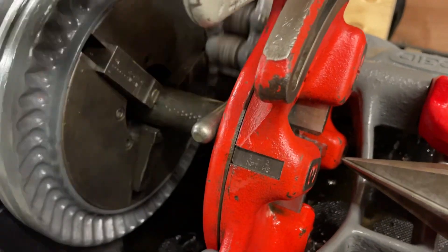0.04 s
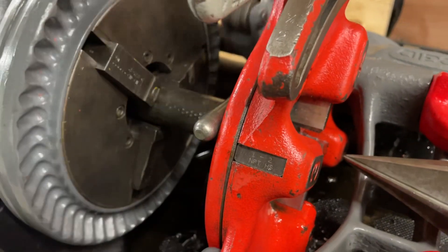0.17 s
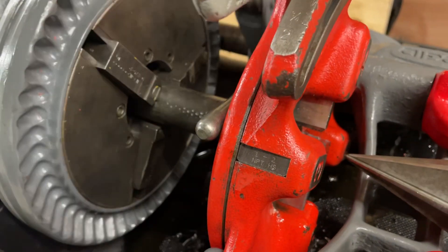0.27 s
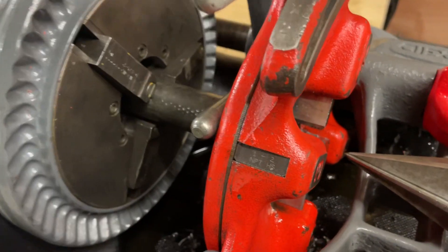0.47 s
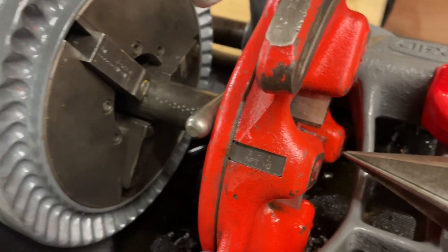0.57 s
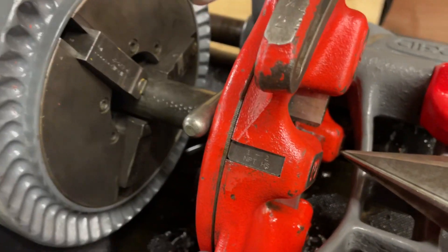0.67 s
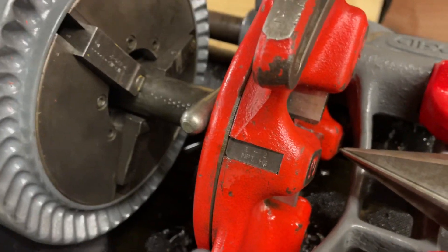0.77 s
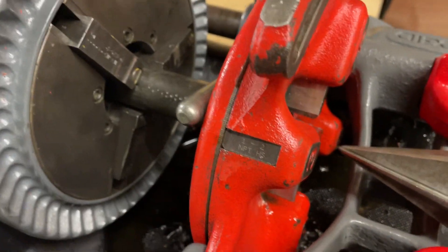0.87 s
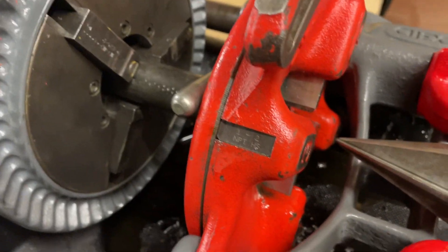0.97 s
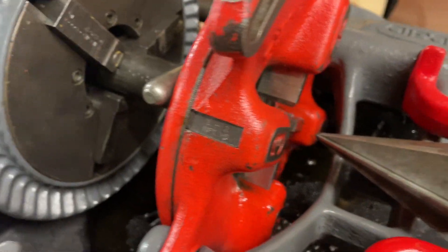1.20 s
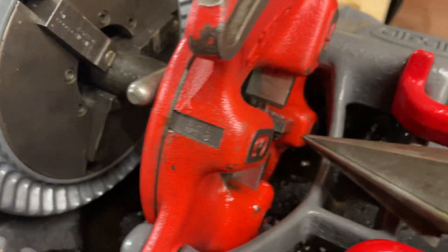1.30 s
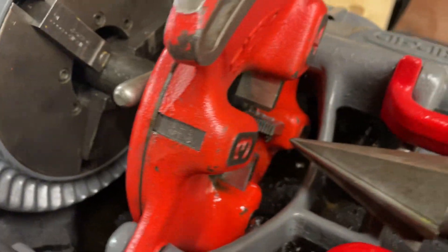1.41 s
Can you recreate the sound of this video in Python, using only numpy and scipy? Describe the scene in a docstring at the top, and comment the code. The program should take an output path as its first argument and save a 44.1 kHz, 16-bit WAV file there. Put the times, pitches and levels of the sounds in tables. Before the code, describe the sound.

Hard steel clank, then half a second later a rattling double clank, over low workshop hum

```python
"""A low wavering hum and rumbling air: a quiet workshop; faint swells of hissing noise lie over the scene.
Close to the microphones, steel parts of a pipe threading machine are swung into place. One drops against its stop
with a single clank; a second lands, bounces and settles with a click. Contact noise excites dense and ringing modes,
the cast frame thuds, shaped noise tails make the room, and the recorder's limiter ducks the clanks, then recovers."""
import sys
import numpy as np
from scipy import signal
from scipy.fft import rfft, irfft
from scipy.io import wavfile
from scipy.ndimage import uniform_filter1d, minimum_filter1d

SR = 44100
rng = np.random.default_rng(int(sys.argv[2]) if len(sys.argv) > 2 else 0)


def log_audio(samples):
    """Write samples as a 16-bit WAV file to the path given in sys.argv[1]."""
    # one column per channel
    frames = np.atleast_2d(samples).T
    # limit to full scale, then quantise
    limited = np.clip(frames, -1, 1)
    pcm = np.round(limited * 32767).astype(np.int16)
    wavfile.write(sys.argv[1], SR, pcm)


N = 63945

# Steady hum lines of the workshop. Each row: frequency [Hz], level before the slow level curve [dB].
HUM_LINES = [(59.2, -34.5), (119.5, -47.5), (181, -58.5), (362, -57.5)]
# Slow level of hum and air together. Each row: time [s], gain [dB].
BACKGROUND_LEVEL = [(0, -2), (.1, -2), (.25, 2), (.5, -0.5), (.72, -2.5), (.93, -5), (1.05, -3),
                    (1.25, -8.5), (1.45, -5.5)]
# Spectrum of the room air. Each row: frequency [Hz], relative density [dB per Hz].
AIR_COLOUR = [(25, -18), (50, -2), (110, -2), (250, -12), (500, -19), (1000, -26), (2000, -32), (4000, -38),
              (7000, -46), (13000, -61)]
HUM_WAVER_DB, AIR_DB = .8, -40.5

# Swells of faint hiss over the scene. Each row: start [s], length before release [s], level [dB].
HISS_SWELLS = [(.008, 0.059, -57), (0.099, 0.36, -64), (0.423, 0.098, -64), (1.04, 0.18, -61.5),
               (1.403, .12, -54)]
# Spectrum of the hiss. Each row: frequency [Hz], relative density [dB per Hz].
HISS_COLOUR = [(200, -5), (1500, -5.5), (4000, -7.5), (6800, -8), (8400, -23), (11000, -8.5),
               (13000, -16.5)]
HISS_ATTACK_S, HISS_RELEASE_S = 0.013, 0.046

# The first clank: a weak onset on one side, then the hard blow and a weaker one. Each row: start [s], level [dB],
# body [dB], presence [dB], top [dB], chatter length [s], left minus right [dB]; levels are relative.
FIRST_CLANK = [(.2222, -21, -24, -5.5, -17, 0.0028, -33), (.2262, 1, 7.5, 1.5, 2.5, 0.001, 2.5),
               (.2305, -11.5, 7, 6.5, 11.5, 0.0013, -2.5)]
# Blows of the second part, landing and bouncing. Each row: start [s], level [dB], body [dB], presence [dB],
# top [dB], chatter length [s], left minus right [dB]; levels are relative.
LATCH_BLOWS = [(.7755, -24, 13, 1.5, -1, 0.004, -7.5), (.779, -21.5, 15.5, -4.5, 11.5, 0.009, 5),
               (.7835, -4, 6.5, 0.5, 4.5, 0.0039, 0.5), (.801, -16, 10.5, 1.5, 2.5, 0.0064, -9.5),
               (.8142, -9, 8, -1, -4, 0.0053, 4.5), (.8405, -29, 10, 12, 9, 0.0068, 13.5),
               (.846, -21, 0.5, 7, 5, 0.0029, -6.5), (.893, -35.5, -8, 6, -4, 0.0015, 5),
               (.9185, -18.5, 7, -18.5, -15, 0.0063, 1), (.939, -26.5, 4.5, 12, 4, 0.0015, 2),
               (.9485, -27.5, 4.5, -28, -7, 0.0049, -4), (.970, -29, 5.5, -52, -11, 0.021, 6)]
# Ringing modes of the first part. Each row: frequency [Hz], relative level [dB], 60 dB decay time [s].
STOP_MODES = [(209.7, -2.5, 0.41), (297.5, -4, .25), (379.5, 6.5, 0.15), (445, -13, 0.095), (542.5, 0, 0.2),
              (664, -8, .16), (802, -2.5, 0.49), (839.5, 7.5, 0.17), (1187, -2, 0.15), (1308, -8.5, 0.65),
              (1540, 4, 0.091), (2040, 5, 0.045), (2680, -5, .12), (2996, 1, 0.13)]
# Ringing modes of the second part. Each row: frequency [Hz], relative level [dB], 60 dB decay time [s].
LATCH_MODES = [(171, -4, 0.51), (257.2, 3.5, .3), (279, -9, 0.73), (382.2, -15.5, 0.067), (461, -7.5, 0.23),
               (492.3, -10.5, 0.29), (544.4, 0.5, 0.13), (672, -6.5, 0.11), (787, 1, 0.33), (1700, -1, .14),
               (1744, -4, .15), (2910, -2.5, .15), (3750, 7, 0.098), (4888, 0, .17)]
# Dense, quickly damped modes of the first part. Each row: frequency [Hz], relative density [dB per Hz].
STOP_COLOUR = [(50, -19.5), (150, -2.5), (350, -4.5), (750, -5), (1600, -4), (3000, -5.5), (4500, -15.5),
               (6700, -17.5), (8400, -28), (11000, -22.5), (12700, -26), (15000, -47)]
# Dense, quickly damped modes of the second part. Each row: frequency [Hz], relative density [dB per Hz].
LATCH_COLOUR = [(70, -28), (250, -13.5), (550, -4), (1200, -7.5), (1700, -3), (2700, -7), (3800, -5.5),
                (6800, -14.5), (8400, -23), (10000, -24), (12500, -22), (15000, -62.5)]
# Gains of the dense modes, the ringing modes and the room; 60 dB decay of the dense modes at TREBLE_HZ
STOP_DB, STOP_RING_DB, STOP_ROOM_DB, STOP_T60_S = 19.5, -22.5, 20.5, 0.047
LATCH_DB, LATCH_RING_DB, LATCH_ROOM_DB, LATCH_T60_S = 23, -17, 23, .04
TREBLE_HZ, DAMPING_SLOPE = 3540, 0.065
# Regions of the spectrum that a blow's body, presence and top levels act on
BODY_HZ, BODY_OCTAVES, PRESENCE_HZ, PRESENCE_OCTAVES, BRIGHT_HZ = 417, 1, 3620, 0.82, 8200
CHATTER_DB, CHATTER_LOW_HZ = 1, 896  # below this the chatter merges into one push
EVEN_HZ = 150  # smoothing width
WIDTH, WIDE_HZ = 0.53, 500  # side against mid in the treble; the bass is alike left and right

# Colour of the workshop's reverberation. Each row: frequency [Hz], gain [dB].
ROOM_COLOUR = [(80, -4), (250, 8.5), (800, 2), (2000, -0.5), (4000, -2), (7000, -2), (12000, -5)]
# Length of the late tail. Each row: frequency [Hz], 60 dB decay time [s].
ROOM_T60 = [(100, 0.35), (500, 0.59), (2500, 0.92), (6000, 0.66), (12000, 0.3)]
ROOM_DB, ROOM_BUILD_S, ROOM_WIDTH = -15.5, 0.032, 0.94
EARLY_DB, EARLY_T60_S = -11, 0.15

# Jolts of the cast frame. Each row: start [s], relative level [dB].
JOLTS = [(0.2307, -0.5), (0.7936, 1), (0.817, -6), (0.947, -15), (0.98, -19)]
# Low modes of the frame. Each row: frequency [Hz], relative level [dB], 60 dB decay time [s].
FRAME_MODES = [(116.5, 0.5, 0.071), (178.7, -1.5, 0.084)]
FRAME_DB = -4.5

# Recorder: treble notch and low cut, then limiter, rounded peaks and top cut
NOTCH_HZ, NOTCH_WIDTH_HZ, NOTCH_DB, LOW_CUT_HZ = 8350, 687, -18.5, 38
LIMIT_DB, HOLD_S, RELEASE_DB_PER_S, LOOKAHEAD_S, DETECT_S = -9, 0.099, 79, 0.0028, .005
CEILING, TOP_HZ = .92, 13300  # for the ceiling, full scale is 1


def undb(db):
    """Decibels to gain."""
    return 10 ** (np.asarray(db) / 20)


def clock():
    """Time of each sample in seconds."""
    return np.arange(N) / SR


def along(points, hz):
    """Reads (Hz, value) points on a log-frequency axis."""
    point_hz, values = np.array(points, float).T
    return np.interp(np.log(hz + 1), np.log(point_hz), values)


def shape(x, db_of):
    """Filters x by a gain in dB given as a function of frequency."""
    hz = np.arange(N + 1) * SR / (2 * N)
    return irfft(rfft(x, 2 * N) * undb(db_of(hz)))[..., :N]


def noise(colour, width):
    """Stereo noise of rms 1 with the given colour, wider towards the treble."""
    hz = np.fft.rfftfreq(N, 1 / SR)
    mid, side = rfft(rng.standard_normal((2, N)))
    side = side * width * hz ** 2 / (hz ** 2 + WIDE_HZ ** 2)
    x = irfft(np.array([mid + side, mid - side]) * undb(along(colour, hz)), N)
    return x / x.std()


def background():
    """A mains hum whose lines waver separately, over the rumble and air of the room."""
    t, hum = clock(), 0
    knots = np.linspace(0, t[-1], num=16)
    for hz, db in HUM_LINES:
        waver_db = HUM_WAVER_DB * np.interp(t, knots, rng.standard_normal(size=16))
        line = np.sin(2 * np.pi * (hz * t + rng.random()))
        hum = hum + np.sqrt(2) * undb(db + waver_db) * line  # root two: levels are rms
    air = undb(AIR_DB) * noise(AIR_COLOUR, ROOM_WIDTH)
    return (hum + air) * undb(np.interp(t, *np.array(BACKGROUND_LEVEL).T))


def faint_hiss():
    """Coloured stereo noise comes and goes in faint swells around the clanks."""
    t, level = clock(), 0
    for start, length, db in HISS_SWELLS:
        end = start + length
        corners = [start, start + HISS_ATTACK_S, end, end + HISS_RELEASE_S]
        level = level + undb(db) * np.interp(t, corners, [0.0025, 1, 0.89, 0])
    return level * noise(HISS_COLOUR, WIDTH)


def contact_db(hz, body_db, presence_db, top_db):
    """Colours one row of a clank: humps of body and presence, and a top shelf."""
    def hump(centre, octaves):
        return np.exp(-(np.log2((hz + 1) / centre) / octaves) ** 2)

    body = body_db * hump(BODY_HZ, BODY_OCTAVES)
    presence = presence_db * hump(PRESENCE_HZ, PRESENCE_OCTAVES)
    top = top_db * hz ** 6 / (hz ** 6 + BRIGHT_HZ ** 6)
    return body + presence + top


def convolve(x, response):
    """Plays x through a stereo response."""
    return signal.fftconvolve(np.atleast_2d(x), response, axes=1)[:, :N]


def part(rows, dense, modes, room):
    """Each row is an impulse and a brief chatter of noise; the part cracks and rings, and the room answers."""
    t, near, contacts = clock(), 0, 0
    high_pass = signal.butter(2, CHATTER_LOW_HZ, "high", fs=SR)
    for start, db, body_db, presence_db, top_db, length, pan_db in rows:
        age = t - start
        chatter = rng.standard_normal(N) * (age > 0) * np.exp(-(age / length) ** 2)
        chatter = signal.lfilter(*high_pass, chatter)
        contact = signal.unit_impulse(N, int(start * SR))
        force = contact + undb(CHATTER_DB) * chatter / np.sqrt(np.sum(chatter ** 2))
        pair = np.array([force, contact])
        force, contact = undb(db) * shape(pair, lambda hz: contact_db(hz, body_db, presence_db, top_db))
        near = near + force * undb(np.array([[pan_db], [-pan_db]]) / 2)
        contacts = contacts + contact
    # chatter drives only the dense modes; ringing and room answer the bare contacts
    return convolve(near, dense) + convolve(contacts, modes + room)


def fade(x, t60_of):
    """Lets each octave of x die away at its own rate; the channels average unit energy."""
    centres = 2. ** np.arange(6, 15)
    hz, spec, out = np.fft.rfftfreq(N, 1 / SR), rfft(x), 0
    for centre, pick in zip(centres, np.eye(len(centres))):
        weight = along(list(zip(centres, pick)), hz)  # overlapping triangles, one per octave
        decay = np.exp(-np.log(1000) * clock() / t60_of(centre))
        out = out + irfft(spec * weight, N) * decay
    return out / np.sqrt(np.sum(out ** 2) / 2)


def even(x, colour):
    """Gives each channel of a short burst the stated colour, keeping its fine peaks; average energy is 1."""
    hz, spec = np.fft.rfftfreq(N, 1 / SR), rfft(x)
    bins = int(EVEN_HZ * N / SR)
    power = uniform_filter1d(uniform_filter1d(np.abs(spec) ** 2, bins), bins)
    flat = spec / np.sqrt(np.abs(power) + 1e-12)
    x = irfft(flat * undb(along(colour, hz)), N) * (clock() < .5)
    return x / np.sqrt(np.sum(x ** 2) / 2)


def crack(colour, t60):
    """The dense, quickly damped modes of a steel part; the higher ones die first."""
    burst = fade(noise(colour, WIDTH), lambda hz: t60 * (TREBLE_HZ / hz) ** DAMPING_SLOPE)
    return even(burst, colour)


def ring(modes):
    """Decaying sines; the higher ones reach the two microphones out of step."""
    t, out = clock(), 0
    draws = 2 * rng.random((len(modes), 2)) - 1
    for (hz, db, t60), (turn, phase) in zip(modes, draws):
        lag = turn * np.array([[1], [-1]]) + np.pi * phase
        lag = lag * hz ** 2 / (hz ** 2 + WIDE_HZ ** 2)
        out = out + undb(db) * np.sin(2 * np.pi * hz * t + lag) * np.exp(-np.log(1000) * t / t60)
    return out


def workshop(colour, db):
    """A part's sound spread by the room: early reflections from machine and bench, and a long tail, as noise."""
    build = 1 - np.exp(-clock() / ROOM_BUILD_S)
    early = fade(noise(colour, ROOM_WIDTH) * build, lambda hz: EARLY_T60_S)
    late = fade(noise(colour, ROOM_WIDTH) * build, lambda hz: along(ROOM_T60, hz))
    both = undb(EARLY_DB) * early + undb(ROOM_DB) * late
    return shape(both, lambda hz: db + along(ROOM_COLOUR, hz))


def frame():
    """The heavy frame takes up the landings with low thuds: impulses through its damped modes."""
    push = np.zeros(N)
    for start, db in JOLTS:
        push[int(start * SR)] += undb(db + FRAME_DB)
    return convolve(push, ring(FRAME_MODES))


def scene():
    """Both parts close by with their room, the frame without added reverberation, the background and hiss."""
    stop = part(FIRST_CLANK, undb(STOP_DB) * crack(STOP_COLOUR, STOP_T60_S),
                undb(STOP_RING_DB) * ring(STOP_MODES), workshop(STOP_COLOUR, STOP_ROOM_DB))
    latch = part(LATCH_BLOWS, undb(LATCH_DB) * crack(LATCH_COLOUR, LATCH_T60_S),
                 undb(LATCH_RING_DB) * ring(LATCH_MODES), workshop(LATCH_COLOUR, LATCH_ROOM_DB))
    return stop + latch + frame() + background() + faint_hiss()


def record(dry):
    """Treble notch and low cut; a limiter ducks, holds and recovers; peaks are rounded and the top is cut."""
    x = shape(dry, lambda hz: NOTCH_DB * np.exp(-((hz - NOTCH_HZ) / NOTCH_WIDTH_HZ) ** 2))
    x = signal.sosfilt(signal.butter(2, LOW_CUT_HZ, "high", fs=SR, output="sos"), x)

    # one detector for both channels
    power = uniform_filter1d(np.mean(x ** 2, axis=0), int(DETECT_S * SR))
    over_db = np.maximum(10 * np.log10(np.abs(power) + 1e-12) - LIMIT_DB, 0)
    hold, ahead = int(HOLD_S * SR), int(LOOKAHEAD_S * SR)
    held_db = -minimum_filter1d(-over_db, hold, origin=(hold - 1) // 2, mode="constant")
    # the duck can shrink no faster than the release rate
    recovery_db = RELEASE_DB_PER_S * clock()
    duck_db = np.maximum.accumulate(held_db + recovery_db) - recovery_db
    # widen, then smooth, so that the gain starts down ahead of a peak
    widened_db = -minimum_filter1d(-duck_db, ahead)
    x = x * undb(-uniform_filter1d(widened_db, ahead))

    x = x / (1 + (x / CEILING) ** 8) ** (1 / 8)
    return signal.sosfilt(signal.ellip(8, .2, 70, TOP_HZ, fs=SR, output="sos"), x)


dry = scene()
out = record(dry)
log_audio(out)
```